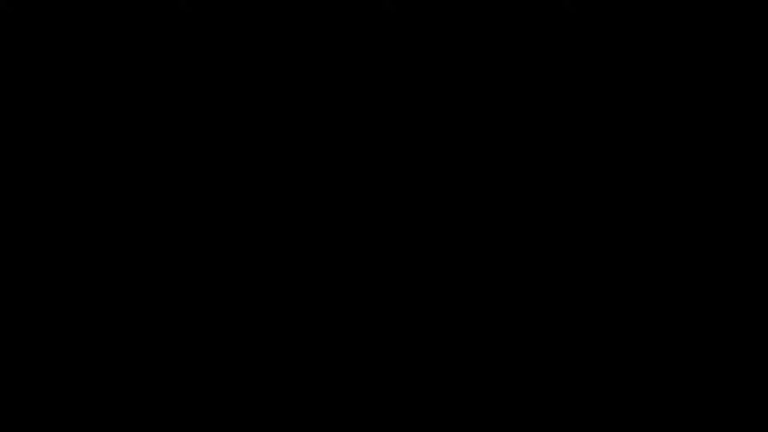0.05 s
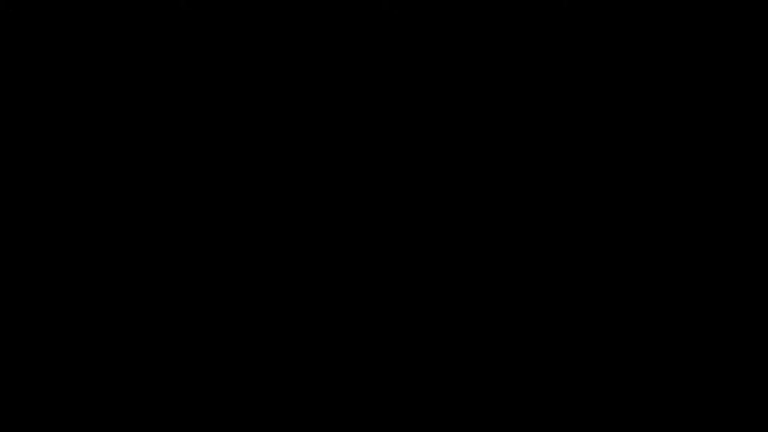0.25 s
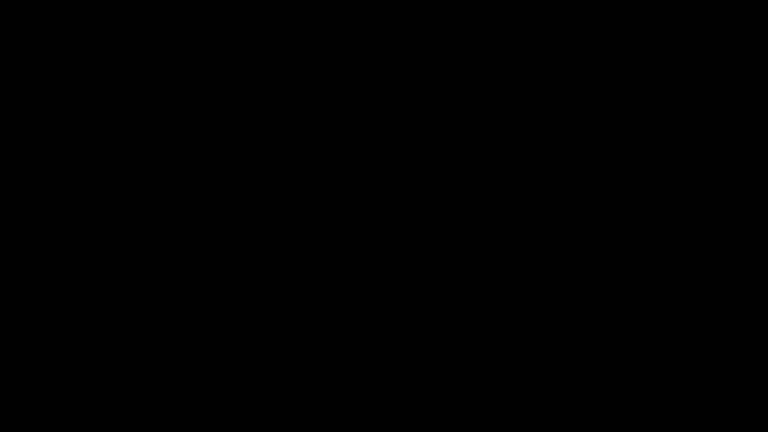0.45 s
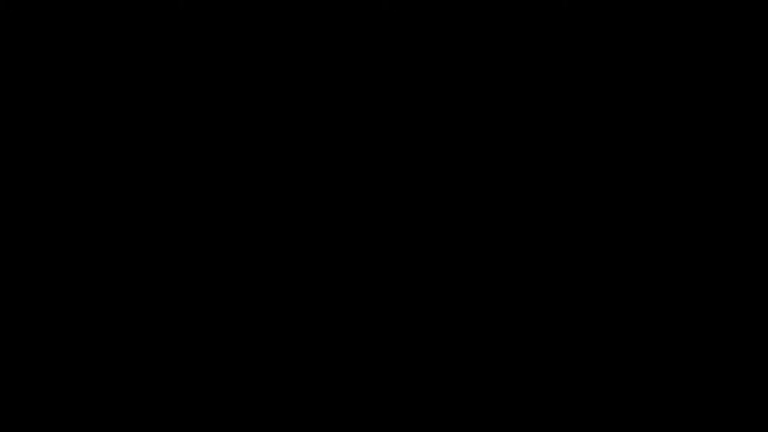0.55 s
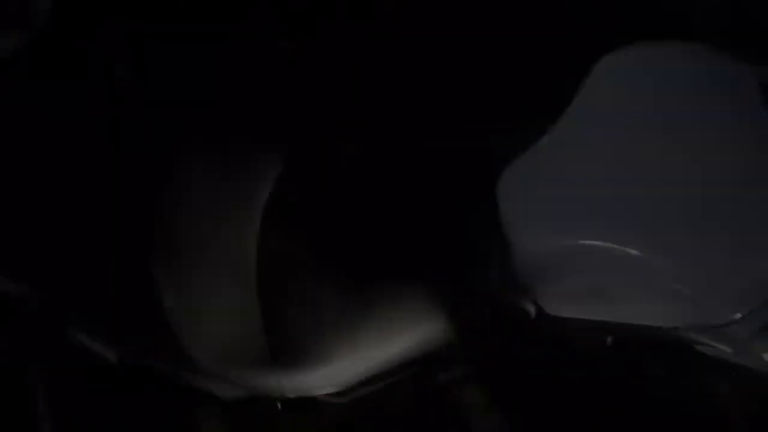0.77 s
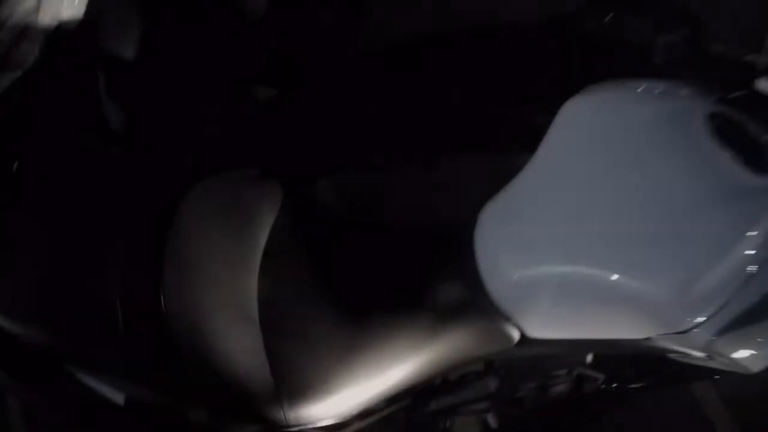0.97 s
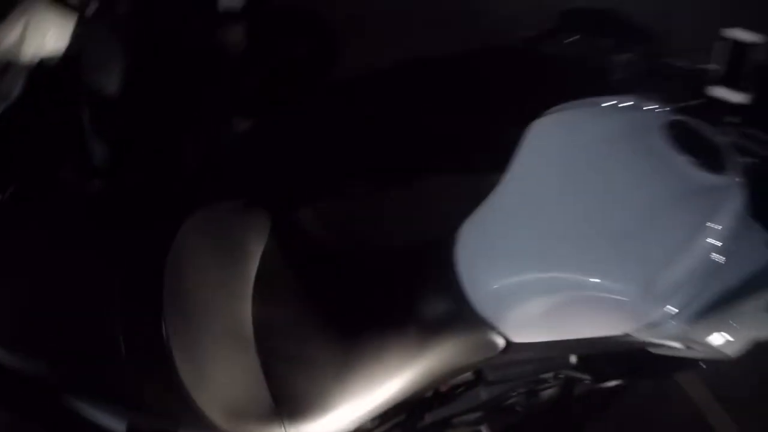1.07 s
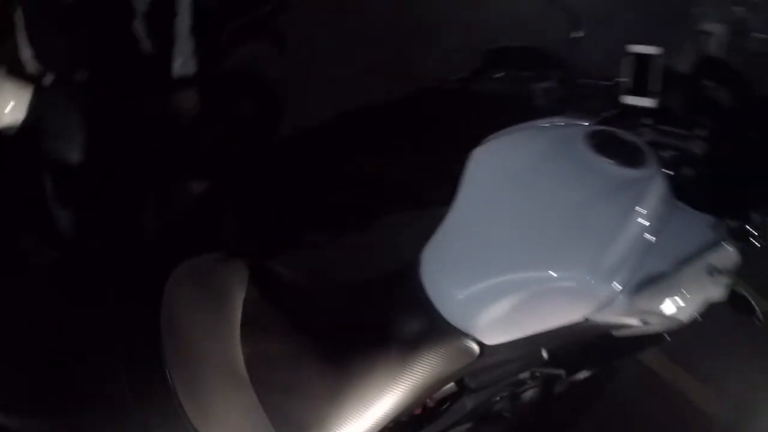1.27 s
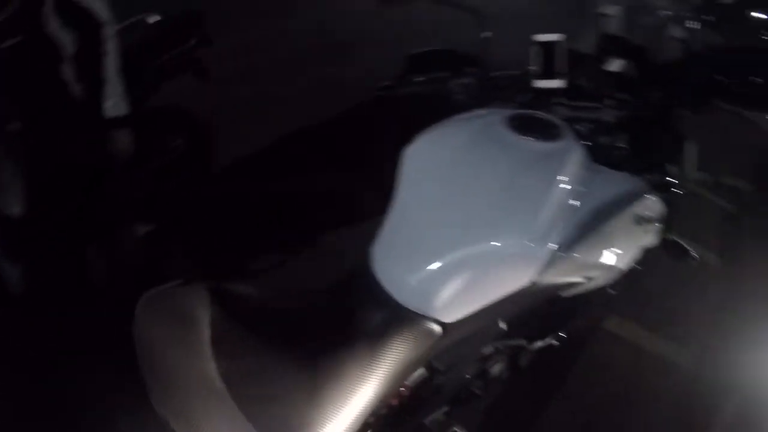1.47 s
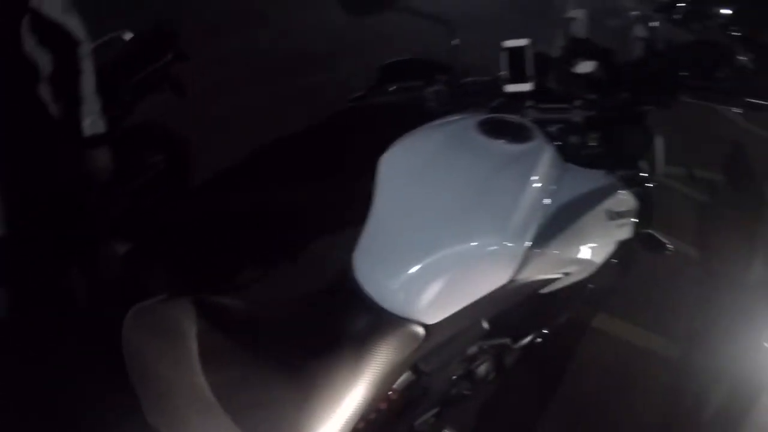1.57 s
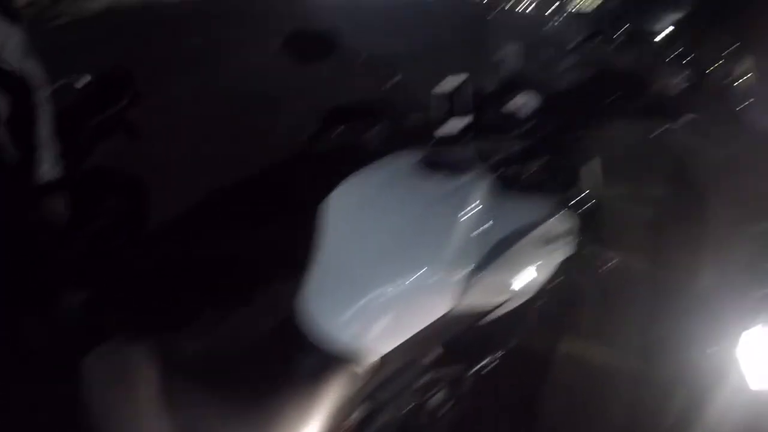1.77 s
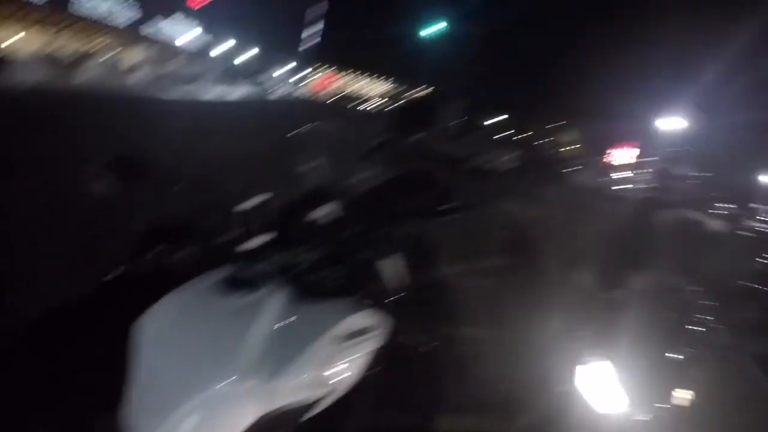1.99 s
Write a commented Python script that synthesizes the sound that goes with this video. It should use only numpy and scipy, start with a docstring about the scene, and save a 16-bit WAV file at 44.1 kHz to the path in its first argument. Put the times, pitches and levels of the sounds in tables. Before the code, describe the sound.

A twin-cylinder motorcycle idles close by, fading in from silence, with clattering valves and steady hum.

```python
"""A twin-cylinder motorcycle idles close to the microphone in a parking lot at night; the sound fades in.
Each cycle two uneven firings ring the exhaust resonances and swell a gas rumble; filtered noise bursts
make the clatter of the pistons and valve gear. Sines make a continuous hum and a thin whine beside it.
Near the end decaying sines make a sharp click, and shaped noise makes a sleeve brushing past.
Light ticks and faint rustles of clothing or gear are noise too."""
import sys
import numpy as np
from scipy import signal
from scipy.fft import rfft, irfft
from scipy.io import wavfile
from scipy.ndimage import map_coordinates

SR = 44100
rng = np.random.default_rng(int(sys.argv[2]) if len(sys.argv) > 2 else 0)


def unload_wav(signal):
    """Save mono or channel-first audio to the path in sys.argv[1] as 16-bit WAV at rate SR, clipped to [-1, 1]."""
    wavfile.write(
        sys.argv[1],
        SR,
        np.round(np.clip(np.atleast_2d(signal).T, -1, 1) * 32767).astype(np.int16),
    )


N = 89522
T = np.arange(N) / SR  # time (s)

# the two firings of an engine cycle, uneven in time and strength: after_cycle_start_s, relative_level_db
FIRINGS = [(0, 0), (.017, -5.2)]


def from_db(db):
    """Decibels to gain."""
    return 10 ** (np.asarray(db) / 20)


def rms_one(x):
    """Scale to rms 1."""
    return x / np.sqrt(np.mean(x ** 2) + 1e-20)


def curve(rows):
    """Join (s, value) rows by straight lines."""
    return np.interp(T, *np.transpose(rows))


def drift(rate_hz):
    """Slow random wander about 0: normal values, rate_hz of them a second, joined by straight lines."""
    return np.interp(T * rate_hz, np.arange(1000), rng.standard_normal(1000))


def noise(colour, size=N):
    """Steady noise with a (Hz, dB per Hz) colour, falling away below its lowest point; rms 1."""
    hz, db = np.transpose(colour)
    f = np.arange(size // 2 + 1) * SR / size + 1e-3
    gain = from_db(np.interp(np.log(f), np.log(hz), db))
    gain = gain * np.minimum(f / hz[0], 1) ** 2
    return rms_one(irfft(rfft(rng.standard_normal(size)) * gain, size))


def resonate(x, hz, width_hz):
    """One damped resonance, a two-pole filter with gain near 1 at its peak."""
    r = np.exp(-np.pi * width_hz / SR)
    feed = np.array([1, 0, -1]) * (1 - r * r) / 2
    back = [1, -2 * r * np.cos(2 * np.pi * hz / SR), r * r]
    return signal.lfilter(feed, back, x + 1e-18)


def impulses(times_s, db):
    """Single-sample pushes at the given times."""
    out = np.zeros(N)
    at = np.round(np.asarray(times_s) * SR).astype(int)
    inside = (at >= 0) & (at < N)
    np.add.at(out, at[inside], from_db(db)[inside])
    return out


def bursts(pushes, attack_s, decay_s):
    """Each push opens an envelope that rises and dies away."""
    envelope = (1 - np.exp(-T / attack_s)) * np.exp(-T / decay_s)
    return signal.fftconvolve(pushes, envelope)[:N]


def swells(rows):
    """Smooth rises and falls from (centre s, half length s, dB) rows."""
    return sum(from_db(db) * np.exp(-((T - s) / half) ** 2) for s, half, db in rows)


def cycle_starts():
    """Times of the first firing of each four-stroke cycle (two turns of the crank)."""
    # idle speed of the crank: time_s, speed_rpm
    speed = [(0, 1613), (.5, 1613), (.6, 1603), (.95, 1603), (1.05, 1614), (1.48, 1614), (1.56, 1589),
             (1.7, 1589), (1.8, 1619)]
    s, rpm = np.transpose(speed)
    starts = [0.111]
    while starts[-1] < T[-1]:
        mid_cycle_s = starts[-1] + 60 / rpm[0]  # about one turn on
        starts.append(starts[-1] + 120 / np.interp(mid_cycle_s, s, rpm))
    return np.array(starts)


def each_cycle(starts, rows, spread_db, jitter_s):
    """Repeat (s, dB) rows in every cycle, a little different each time."""
    s, db = np.transpose(rows)
    time_chance, level_chance = rng.standard_normal((2, len(starts), len(s)))
    times_s = starts[:, None] + s + jitter_s * time_chance
    levels_db = db + spread_db * level_chance
    return impulses(times_s.ravel(), levels_db.ravel())


def exhaust(starts):
    """Two rounded gas puffs a cycle ring the resonances of the pipe and silencer."""
    # pipe and silencer resonances: frequency_hz, width_hz, relative_level_db, polarity
    pipe = [(39.4, 8, -27.7, -1), (56.9, 32.4, -24.2, 1), (69.2, 19.2, -22.4, -1), (106.9, 13.6, -24.4, -1)]
    exhaust_db, puff_s = 1, 0.00041  # puff_s is the Gaussian's standard deviation
    pulses = each_cycle(starts, FIRINGS, spread_db=0.63, jitter_s=0.0001)
    pulses = pulses * np.mean(np.diff(starts)) * SR / 2  # two 0 dB pulses a cycle would average 1
    puff = signal.windows.gaussian(441, puff_s * SR)
    puffs = signal.fftconvolve(pulses, puff / puff.sum(), "same")
    rings = sum(sign * from_db(db) * resonate(puffs, hz, width) for hz, width, db, sign in pipe)
    return from_db(exhaust_db) * rings


def rumble(starts):
    """Uneven, turbulent gas flow: low noise swells after each firing over a steady bed."""
    # colour of the gas flow: frequency_hz, density_db_per_hz
    flow_colour = [(18, -17), (45, 9), (90, 12.5), (150, 6.5), (220, -7.5), (320, -18), (600, -41.5)]
    rumble_db = -33
    pushes = each_cycle(starts, FIRINGS, spread_db=5.5, jitter_s=0.00013)
    flow = rms_one(bursts(pushes, attack_s=0.0058, decay_s=0.049))
    return from_db(rumble_db) * rms_one((flow + 0.4) * noise(flow_colour))


def rattle(starts, rows, colour, decay_s, bed, repeats, spread_db):
    """Noise bursts on a steady bed; a share of their grain comes back alike in every cycle."""
    pushes = each_cycle(starts, rows, spread_db, jitter_s=0.00055)
    gate = rms_one(bursts(pushes, 0.0011, decay_s))
    # one cycle's worth of noise, stretched to fit each cycle
    size = int(np.median(np.diff(starts)) * SR)
    position = np.interp(T, starts, np.arange(len(starts))) * size
    looped = map_coordinates(noise(colour, size=size), [position], order=3, mode="grid-wrap")
    share = np.clip(repeats, 0, 1)  # share of the power
    grain = np.sqrt(share) * looped + np.sqrt(1 - share) * noise(colour)
    return rms_one(grain * (gate + bed))


def clatter(starts):
    """Piston and valve contacts thud in the block, clack, tick and ring the engine cover."""
    # contacts in a cycle, relative levels: after_cycle_start_s, thud_db, clack_db, tick_db
    contacts = [(.001, 5.5, -1.5, -6.5), (.006, 6.5, -12.5, -6), (.019, -17, -1.5, 7.5),
                (.025, 8.5, -23.5, -1), (.0345, 2.5, -24.5, 1), (.0415, -15.5, -1, 6.5),
                (.056, 4, 1, -16.5), (.070, -44.5, -4.5, 5.5)]
    # colour of the thud in the block: frequency_hz, density_db_per_hz
    thud_colour = [(270, -3), (400, -11.5), (520, -2.5), (700, -6.5), (900, -10.5), (1300, -20),
                   (2500, -52)]
    # colour of the clack: frequency_hz, density_db_per_hz
    clack_colour = [(600, -6), (1000, 5), (1200, -1.5), (1400, 3.5), (1640, 0.5), (1900, -13), (2330, -16),
                    (2700, -15.5), (3300, -15), (6000, -26)]
    # colour of the tick: frequency_hz, density_db_per_hz
    tick_colour = [(1500, 5), (3000, 2.5), (4400, 6.5), (5800, 5.5), (7500, 0.5), (9500, -0.5), (11500, 1),
                   (15000, -11)]
    # engine cover modes: frequency_hz, width_hz, level_db
    cover_modes = [(1062.4, 37, -44.5), (1558, 104, -53), (2297, 110, -58.5)]
    # level change of the clatter as the microphone nears the engine: time_s, level_db
    nearing = [(0, -0.5), (.7, 0.5), (1.3, 1), (1.7, 1.5), (2.03, 0.5)]
    thud_db, clack_db, tick_db = -37.5, -43.5, -54

    s, thuds, clacks, ticks = np.transpose(contacts)
    thud = rattle(starts, np.c_[s, thuds], thud_colour, decay_s=0.0055, bed=0.85, repeats=0.7, spread_db=2.4)
    clack = rattle(starts, np.c_[s, clacks], clack_colour, decay_s=0.013, bed=0.45, repeats=0.29, spread_db=2.0)
    tick = rattle(starts, np.c_[s, ticks], tick_colour, decay_s=0.0051, bed=1.27, repeats=0.14, spread_db=4.5)

    pushes = each_cycle(starts, np.c_[s, clacks], spread_db=1.5, jitter_s=0.00049)
    strikes = bursts(pushes, 0.001, 0.013) * rng.standard_normal(N)
    cover = 0
    for hz, width, db in cover_modes:
        ring = resonate(resonate(strikes, hz, width), hz, 4 * width)
        cover = cover + from_db(db) * rms_one(ring)
    rattles = from_db(thud_db) * thud + from_db(clack_db) * clack + from_db(tick_db) * tick
    return from_db(curve(nearing)) * (rattles + cover)


def wavering_phase(hz, waver):
    """Phase of a slightly wavering tone; waver is a fraction of its frequency."""
    return 2 * np.pi * np.cumsum(hz * (1 + waver * drift(14.16))) / SR


def hum_and_whine():
    """A clean low hum and a thin whine, perhaps of the fuel pump, with faint overtones; all sines."""
    # level of the hum: time_s, level_db
    hum_level = [(0, -25.5), (.7, -23), (1.0, -24), (1.28, -23.5), (1.5, -25.5), (2.03, -28)]
    # level of the whine: time_s, level_db
    whine_level = [(0, -41.5), (.8, -41.5), (1.25, -36.5), (1.6, -38), (2.03, -38)]
    # partials of the whine: multiple, relative_level_db
    whine_parts = [(1, -1.5), (2, -21), (6, -28)]
    hum_hz, whine_hz = 239.4, 783.2
    hum_gain = np.sqrt(2) * from_db(curve(hum_level) + 0.3 * drift(12))  # sqrt(2): rms to peak
    hum = hum_gain * np.sin(wavering_phase(hum_hz, waver=0.001))
    phase = wavering_phase(whine_hz, waver=0.0007)
    whine = sum(from_db(db) * np.sin(round(k) * phase) for k, db in whine_parts)
    whine_gain = np.sqrt(2) * from_db(curve(whine_level) + 0.56 * drift(27.2))
    return hum + whine_gain * whine


def click():
    """One slightly cushioned contact: each mode swells and dies within a few milliseconds."""
    # what the click rings with: frequency_hz, relative_level_db, time_to_peak_s
    modes = [(330, -8, .003), (600, -6, .0015), (820, -6, .001), (1400, -6, .0006), (1880, -2, .0008),
             (3760, -9.5, .0007)]
    click_s, click_db = 1.6872, -17
    age = np.maximum(T - click_s, 0)
    out = 0
    for hz, db, rise_s in modes:
        envelope = age / rise_s * np.exp(1 - age / rise_s)  # peaks at 1
        out = out + from_db(click_db + db) * envelope * np.sin(2 * np.pi * hz * age)
    return out


def clothing():
    """Light ticks of clothing or gear, faint high rustles and a sleeve brushing past, all shaped noise."""
    # light ticks: time_s, level_db
    tick_rows = [(.785, -41), (0.801, -35.5), (1.047, -41), (1.644, -33), (1.869, -38)]
    # colour of the light ticks: frequency_hz, density_db_per_hz
    tick_colour = [(1200, 0), (2000, 10), (3000, -5), (7000, -6), (10000, -6), (12500, 0), (15000, -1)]
    # overlapping swishes of the sleeve: centre_s, half_length_s, level_db
    swish_rows = [(1.8, 0.12, -44.5), (1.925, 0.065, -40)]
    # colour of the swishes: frequency_hz, density_db_per_hz
    swish_colour = [(600, 0.5), (1200, 2), (2000, 5.5), (2800, -1.5), (4300, -4), (5500, -17.5),
                    (9000, -36), (15000, -43)]
    # dull rub of the cloth under the swishes: time_s, level_db
    rub_level = [(1.2, -53), (1.45, -42), (1.75, -36.5), (1.93, -36), (2.03, -41)]
    # colour of the rub: frequency_hz, density_db_per_hz
    rub_colour = [(200, -15), (350, 2), (560, -3.5), (800, -16.5), (1400, -16), (3000, -36.5)]
    # faint high rustles: centre_s, half_length_s, level_db
    rustle_rows = [(0.46, 0.076, -49.5), (0.888, 0.05, -52.5)]
    # colour of the rustles: frequency_hz, density_db_per_hz
    rustle_colour = [(2000, -8), (5000, 6), (8000, 6), (11500, 9), (15000, -1)]

    tick_gate = bursts(impulses(*np.transpose(tick_rows)), attack_s=0.00034, decay_s=0.0031)
    ticks = tick_gate * noise(tick_colour)
    flutter = from_db(1.0 * drift(250))
    swish = swells(swish_rows) * flutter * noise(swish_colour)
    rub = from_db(curve(rub_level)) * noise(rub_colour)
    rustles = swells(rustle_rows) * noise(rustle_colour)
    return ticks + rustles + swish + rub


def scene():
    """The idling engine close by, with someone moving beside it; one channel."""
    starts = cycle_starts()
    engine = exhaust(starts) + rumble(starts) + clatter(starts)
    return (engine + hum_and_whine() + click() + clothing())[None]


def record(dry):
    """The sound fades in from silence and a steep low-pass cuts the top."""
    # fade-in: time_s, level_db
    fade = [(.11, -80), (.15, -49.5), (.21, -32.5), (.33, -20), (.45, -11), (.57, -8), (.8, -3), (1.0, -1),
            (2.03, 0)]
    cutoff_hz = 15300
    opening = np.clip(T / fade[0][0], 0, 1) ** 2  # from zero up to the first row
    faded = dry * from_db(curve(fade)) * opening
    low_pass = signal.ellip(14, 0.1, 80, cutoff_hz, fs=SR, output="sos")
    return signal.sosfilt(low_pass, faded)


dry = scene()
out = record(dry)
unload_wav(out)
```